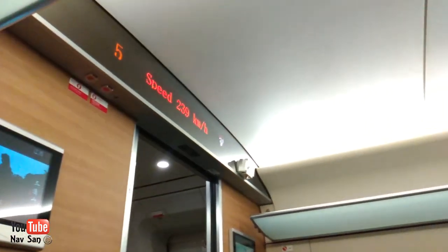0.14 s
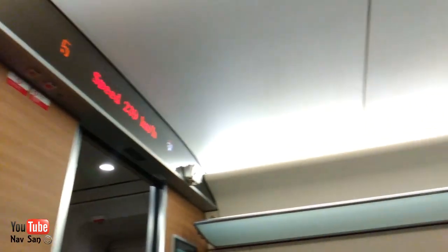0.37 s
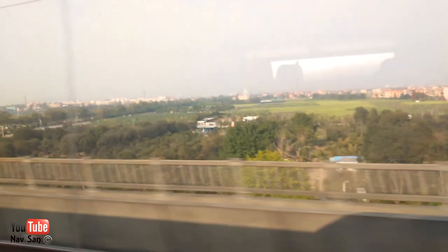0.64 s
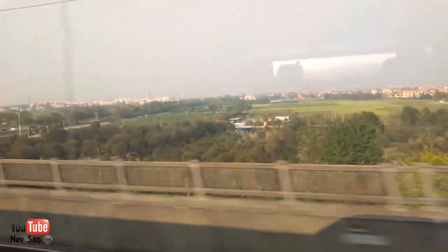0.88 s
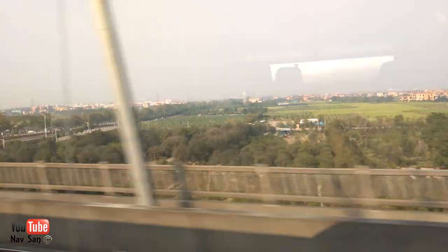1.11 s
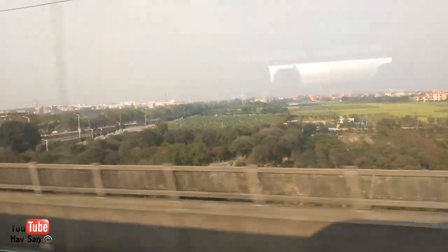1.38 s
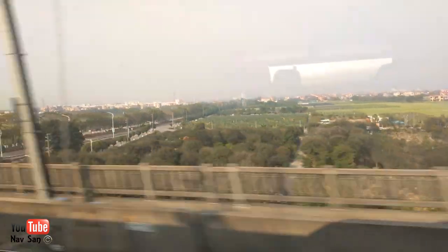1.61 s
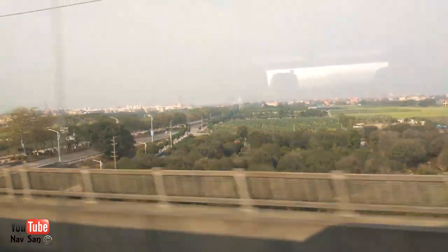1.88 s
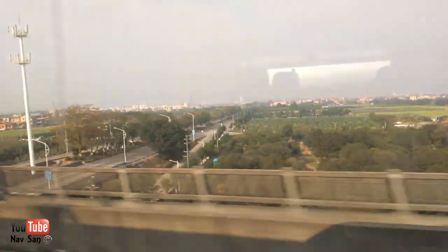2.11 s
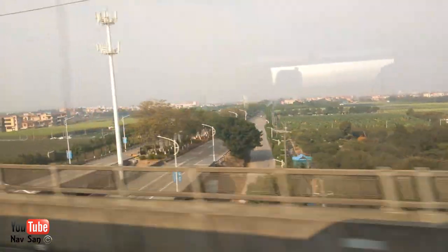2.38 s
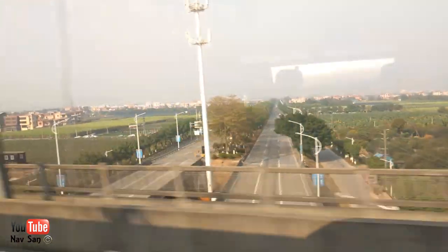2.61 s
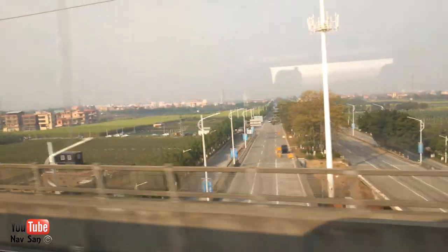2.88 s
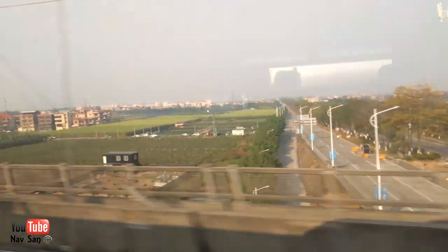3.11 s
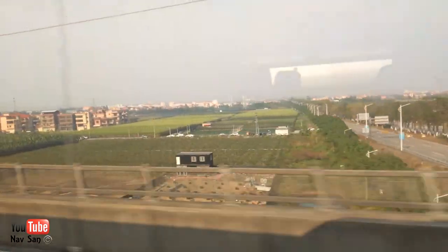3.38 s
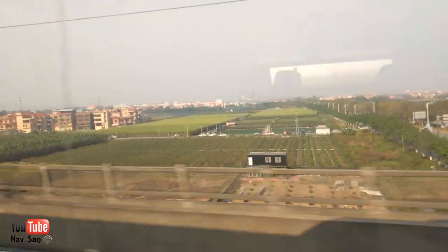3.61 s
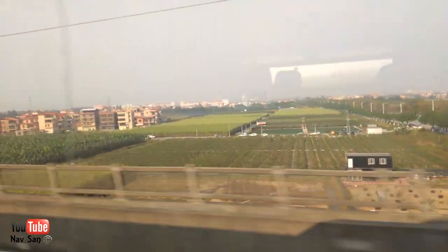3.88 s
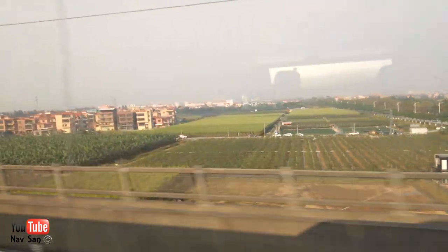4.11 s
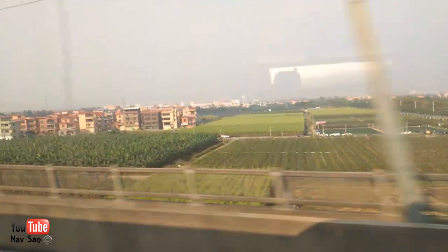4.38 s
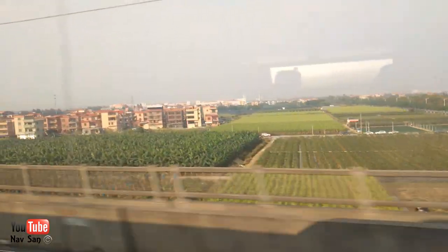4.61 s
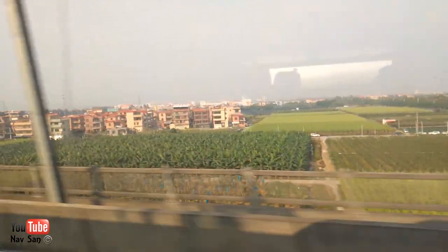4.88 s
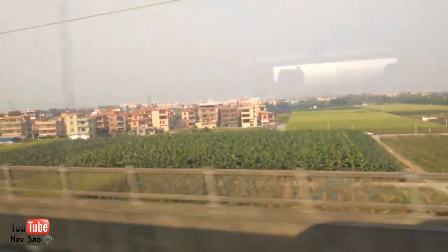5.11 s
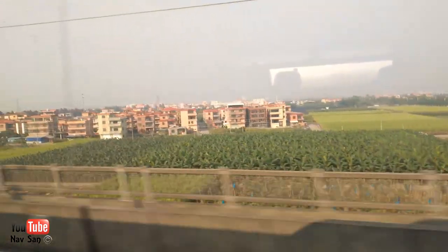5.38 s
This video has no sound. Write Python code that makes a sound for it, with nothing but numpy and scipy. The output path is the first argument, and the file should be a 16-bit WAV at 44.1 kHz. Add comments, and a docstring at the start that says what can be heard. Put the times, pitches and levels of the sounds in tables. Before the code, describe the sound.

Continuous low rumble and mid-range rolling roar of a speeding train, heard inside the carriage on a small handheld stereo device. It begins with more treble rush near the door, swelling briefly into an abrupt click and cut. At the window seat the sound darkens; something rubs past close by, then the roar and boom keep throbbing gently, with tiny dull ticks, fitting squeaks and faint hiss to the end.

```python
"""Inside a fast train: the car body booms and drones, wheel and air roar come through floor and window,
with a faint hiss on top. Most layers are shaped noise; unsteady sines hum beneath.
It opens near the car end, with a brighter roar; a hard edit with a click moves to a window seat,
where something brushes past and air swells by. Small ticks, snaps and squeaks sound in both places.
A two-port microphone subtracts each port, delayed, from the other."""
import sys
import numpy as np
from scipy import signal
from scipy.fft import rfft, irfft, next_fast_len
from scipy.io import wavfile
from scipy.ndimage import uniform_filter1d, map_coordinates

SR = 44100
rng = np.random.default_rng(int(sys.argv[2]) if len(sys.argv) > 2 else 0)


def int16_out(signal):
    """Quantize to a 16-bit WAV file."""
    q = np.round(np.clip(np.atleast_2d(signal).T, -1, 1) * 32767)
    wavfile.write(sys.argv[1], SR, q.astype(np.int16))


def volts_from_decibels(level):
    """Turn decibel levels (scalar or array-like) into linear amplitude factors."""
    exponent = np.asarray(level, float) / 20
    return 10 ** exponent


N = 242550  # samples, 5.5 s

# All levels are those at the ports, ahead of the microphone's own response.
EDIT_S = .6609  # the move from car end to window seat

# Resonances of the car shell in three groups: centre_hz, width_hz (of one pass), relative_db
BOOM = [(52, 5.8, 2), (66.4, 7.3, -6.5)]
DRONE = [(114.5, 79, 1.5), (125, 12, -1), (171, 42, -4)]
PANEL = [(234, 72.5, -2.5), (272.2, 28, 1.5), (311.7, 40, -8)]
# Base levels of the groups, and the full length of their level bumps
BOOM_DB, DRONE_DB, PANEL_DB = -32.5, -24.5, -30.5
THROB_S, SWELL_S = .16, 0.15
# Throbs of the boom, swells and sags of drone and panels: centre_s, rise_db (negative sags)
THROBS = [(.17, -1), (.77, 0), (.93, 9), (1.05, 9.5), (1.78, 11), (1.99, 3.5), (2.12, 5.5), (2.24, 6.5),
          (2.93, -9.5), (3.02, 6.5), (3.2, 7), (3.29, 2), (3.57, 8), (3.68, 5.5), (3.88, 6), (4.1, 6.5),
          (4.29, 9), (4.52, 9), (4.78, 5.5), (5.08, 7), (5.39, 8)]
DRONE_SWELLS = [(.68, 2.5), (.87, 4), (1.21, 5.5), (1.38, -3.5), (1.65, 3), (2.25, 1), (2.53, 5.5),
                (2.71, 3.5), (3.08, 3.5), (3.37, 5), (3.55, -4.5), (3.76, 4.5), (4.17, 3), (4.6, 5),
                (4.89, 1), (5.2, -3), (5.35, 0.5)]
PANEL_SWELLS = [(.15, 5.5), (.8, 5), (.96, -11.5), (1.19, 4), (1.66, 6), (2.2, 2), (2.67, 6), (3.05, 5.5),
                (3.5, 4.5), (3.81, 2), (4.09, 1), (4.51, 4.5), (5, -6), (5.15, -4.5), (5.29, 8),
                (5.41, 3.5)]
# Wavering tones of the running gear: pitch_hz, level_db (rms before wavering)
HUM = [(134.6, -37), (640, -56), (748.3, -52), (1570, -72.5), (2160, -79.5)]
# Drift of the rumble between the ports as the microphone turns: time_s, left_over_right_db
SHELL_LEAN = [(0, -2.5), (.6, -2.5), (.7, .5), (2.3, .5), (2.7, -1), (4.2, .5), (4.7, 0), (5.5, -2)]

# Rolling roar as the rail surface changes: time_s, level_db
ROUGH_TRACK = [(.7, -35.5), (.78, -38), (.9, -35), (1.1, -35), (1.42, -38.5), (1.77, -34.5), (1.89, -37),
               (2.15, -35), (2.3, -35), (2.4, -38.5), (2.65, -35.5), (2.8, -38), (3.07, -35), (3.3, -34),
               (3.45, -32), (3.63, -37.5), (3.85, -35), (3.97, -38), (4.23, -34), (4.42, -36),
               (4.58, -32.5), (4.75, -34.5), (5.5, -36)]
# Hiss of air past the window: time_s, level_db
AIRFLOW = [(1.2, -80.5), (1.46, -78), (1.62, -75), (1.77, -79.5), (2.45, -82.5), (2.7, -80), (3.07, -78),
           (3.49, -86.5), (3.65, -81), (3.82, -75.5), (4.0, -78), (4.23, -76.5), (4.7, -76.5), (5.18, -77),
           (5.5, -74)]
# Noise colours at the seat: freq_hz, relative_db
ROAR = [(25, -29), (40, -12), (80, -9), (200, -10.5), (330, 8.5), (450, 11.5), (700, 6.5), (950, 5.5),
        (1150, -3), (1600, -11), (2200, -15.5), (3000, -36), (4000, -69.5)]
RUSH = [(800, -33.5), (1500, 8), (2200, -1), (3000, -6), (4000, -16), (5500, -14), (8000, -20.5),
        (12000, -44)]
HISS = [(2000, -34.5), (4000, -6), (6000, -16), (8000, -7), (10000, -5), (13000, -19), (16500, -35.5)]
AIRY = [(4000, -31), (7000, -11), (10000, -1.5), (12000, -4), (13500, -1), (15300, -5), (16500, -44)]
RUSH_DB, AIRY_DB = -57.5, -79  # mean levels at the seat
RUSH_PER_TRACK, RUSH_PER_AIR, AIRY_PER_AIR = 0.31, .4, .8  # dB per dB of track or airflow

# Noise colours near the car end: freq_hz, relative_db
END_ROAR = [(150, -39.5), (300, 6.5), (500, 0), (900, -3.5), (1200, -9.5), (1700, -19), (2500, -27),
            (3500, -58)]
END_RUSH = [(800, -31), (1500, 5.5), (2200, 4), (3000, 0), (3700, -2.5), (4200, -6.5), (6000, -13),
            (9000, -23), (12000, -56), (15000, -47)]
END_ROAR_DB, END_RUSH_DB = -30, -50.5  # levels before the rise
END_RISE_DB, END_RISE_S = 4, 0.045  # rise of the rush at the edit, and its time constant

# Swish of the brushing stroke: freq_hz, relative_db
BRUSHED = [(300, -5.5), (500, 7), (1000, 7), (2200, 6), (2950, -1.5), (4000, -7.5), (5200, -9), (6300, -11),
           (7500, -14), (11000, -19.5), (15000, -29), (16000, -44.5)]
# Narrow resonance of the rubbed surface: centre_hz, width_hz (of one pass), relative_db
WHISTLE = [(2970, 150, 0)]
BRUSH_S, BRUSH_DB = .856, -42  # onset and level of the stroke
BRUSH_ATTACK_S, BRUSH_HOLD_S, BRUSH_RELEASE_S = .032, .014, .026
TRAIL_DB, TRAIL_S = -52.5, .29  # the softer drag that follows
WHISTLE_DB, WHISTLE_TRAIL_DB = -15, 3.5  # relative to the swish; extra in the drag

# Dull ticks: start_s, peak_db (of the dull core), centre_hz
TICKS = [(.487, -40, 2800), (1.2552, -47, 2600), (1.673, -44, 2800), (1.787, -48, 3200),
         (1.799, -44.5, 2900), (2.17, -45, 2700), (2.329, -44, 2900), (2.695, -44, 2700),
         (3.439, -45, 2600), (3.868, -44, 2800), (4.269, -46, 2700), (4.606, -44.5, 2700),
         (5.022, -48, 2800), (5.099, -47, 2700), (5.294, -48, 2600)]
# Bright crackling snaps: start_s, left_peak_db, centre_hz, decay_s, left_over_right_db
SNAPS = [(.488, -44, 10500, .001, 12), (2.0945, -52, 10500, .011, -1), (5.021, -60, 7500, .006, -2),
         (5.031, -55, 8000, .007, -4), (5.4145, -56, 7500, .005, 3)]
# Tiny squeaks: middle_s, peak_db, start_pitch_hz, length_s
SQUEAKS = [(0.225, -54, 2640, .06), (0.243, -58.5, 3770, 0.09), (.48, -49, 2595, .05),
           (0.784, -53, 1650, .2), (1.756, -64.5, 2970, .05), (1.788, -68, 4620, .02),
           (1.851, -51, 1805, 0.05), (1.934, -69, 2970, 0.07), (1.949, -73, 4620, .04),
           (3.386, -48, 1570, .09), (3.7, -56, 1783, 0.068), (3.786, -68, 4680, 0.046),
           (4.323, -49.5, 1610, 0.18)]

# Airy swells: middle_s, level_db (at the middle), length_s
WHOOSHES = [(0.775, -72.5, 0.12), (1.495, -76, 0.1), (1.607, -80, .06), (2.599, -74, 0.3),
            (2.615, -72.5, 0.12), (3.846, -81, 0.25), (4.235, -78.5, 0.1)]
# Colour of the airy swells: freq_hz, relative_db
WHOOSH = [(3000, -37), (5000, -3.5), (6300, -5), (8000, 2.5), (11000, 3), (14000, -2), (15500, -16),
          (16500, -35.5)]

# Likeness of the noise at the two ports: freq_hz, correlation (no unit)
ALIKE = [(40, .75), (65, 0.46), (100, 0.78), (200, 0.62), (350, 0.73), (500, 0.67), (800, 0.83),
         (1200, 0.23), (1600, 0.07)]
# Balance of the ports at the seat and near the car end: freq_hz, left_over_right_db
SEAT_LEAN = [(50, -4), (70, 0.5), (105, -4), (135, 3), (200, 0), (600, 0.5), (1000, 5.5), (1500, 16),
             (2100, 3), (2600, -3), (3600, -1), (6000, -0.5), (12000, 1)]
END_LEAN = [(300, 1), (1000, -0.5), (1500, 5), (2600, 5.5), (6000, 2.5), (12000, 4.5)]
# Share of the other port that is subtracted: freq_hz, share (no unit)
CROSS = [(300, 0.025), (550, 0), (1000, 0.72), (2000, 0.59), (3100, 0.98), (4200, 0.38), (5200, 0.3),
         (6300, 0.4), (8000, 0.2), (12000, 0.1)]
PORT_DELAY_S, MIC_LOW_HZ = 0.0004814, 40.3  # delay between ports, corner of the bass cut


def body():
    """Track roughness shakes the car shell, which answers in three resonance groups; running gear hums."""
    boom_db = BOOM_DB + swells(THROBS, THROB_S)
    drone_db = DRONE_DB + swells(DRONE_SWELLS, SWELL_S)
    panel_db = PANEL_DB + swells(PANEL_SWELLS, SWELL_S)
    shell = 0
    for level_db, modes in [(boom_db, BOOM), (drone_db, DRONE), (panel_db, PANEL)]:
        ringing = rush(resonant(modes), SEAT_LEAN, patchy_db=-0.5)
        shell = shell + volts_from_decibels(level_db) * evened(ringing, hold_s=0.041, share=0.82)
    lean_db, = curves(SHELL_LEAN)
    leaning_shell = volts_from_decibels(np.outer([.5, -.5], lean_db)) * shell
    return leaning_shell + volts_from_decibels([[1], [-1]]) * running_gear()


def running_gear():
    """Sines whose level and phase both wander smoothly."""
    t = np.arange(N) / SR
    hum = 0
    for hz, db in HUM:
        level = volts_from_decibels(db + 2.5 * wobble(6)) * np.sqrt(2)  # rms to peak
        hum = hum + level * np.sin(2 * np.pi * hz * t + 2 * wobble(12))
    return hum


def window_seat():
    """Rolling roar follows the track, hiss and airy treble follow the airflow, the rush follows both."""
    roar_db, = curves(ROUGH_TRACK)
    hiss_db, = curves(AIRFLOW)
    track = roar_db - roar_db.mean()
    flow = hiss_db - hiss_db.mean()
    rush_db = RUSH_DB + RUSH_PER_TRACK * track + RUSH_PER_AIR * flow + 1.1 * wobble(19)
    airy_db = AIRY_DB + AIRY_PER_AIR * flow + .9 * wobble(18)
    roar = volts_from_decibels(roar_db) * rush(coloured(ROAR), SEAT_LEAN, patchy_db=1.06)
    air = volts_from_decibels(rush_db) * rush(coloured(RUSH), SEAT_LEAN, patchy_db=2.6)
    hiss = volts_from_decibels(hiss_db + .9 * wobble(17)) * rush(coloured(HISS), SEAT_LEAN, patchy_db=1.5)
    airy = volts_from_decibels(airy_db) * rush(coloured(AIRY), SEAT_LEAN, patchy_db=5.0)
    return roar + air + hiss + airy + brush()


def car_end():
    """Near the gangway the roar leaks in with much more treble, growing just before the edit."""
    to_edit_s = np.minimum(np.arange(N) / SR - EDIT_S, 0)
    rise_db = END_RISE_DB * np.exp(to_edit_s / END_RISE_S)
    roar_db = END_ROAR_DB + rise_db / 3 + 0.41 * wobble(6)
    rush_db = END_RUSH_DB + rise_db + 1.2 * wobble(14)
    roar = volts_from_decibels(roar_db) * rush(coloured(END_ROAR), END_LEAN, patchy_db=1.5)
    return roar + volts_from_decibels(rush_db) * rush(coloured(END_RUSH), END_LEAN, patchy_db=2.2)


def brush():
    """One brisk stroke nearby: friction noise with a whistling resonance, then a trailing drag."""
    t = np.arange(N) / SR - BRUSH_S
    rise = np.clip(t / BRUSH_ATTACK_S, 0, 1)
    release_t = np.maximum(t - BRUSH_ATTACK_S - BRUSH_HOLD_S, 0)
    stroke = volts_from_decibels(BRUSH_DB) * np.exp(-release_t / BRUSH_RELEASE_S)
    trail = volts_from_decibels(TRAIL_DB) * np.clip(1 - (t / TRAIL_S) ** 4, 0, 1)
    swish = (stroke + trail) * rush(coloured(BRUSHED), SEAT_LEAN, patchy_db=1.5)
    ringing = evened(rush(resonant(WHISTLE), SEAT_LEAN, patchy_db=1), hold_s=.02, share=.7)
    whistle = volts_from_decibels(WHISTLE_DB) * (stroke + volts_from_decibels(WHISTLE_TRAIL_DB) * trail) * ringing
    return rise * volts_from_decibels(1.8 * wobble(160)) * (swish + whistle)


def ticks():
    """Short dull ticks, as of a recorder clipping on the tallest pressure peaks: struck, gritty bands."""
    out, t = np.zeros((2, N + SR)), np.arange(SR // 3) / SR
    for s, db, hz in TICKS:
        impulse = [[1], [.8]] * (t == 0)
        grit = .04 * rng.standard_normal((2, len(t)))
        blow = (impulse + grit) * volts_from_decibels(-60 * t / .01)  # falls 60 dB in 10 ms
        core = band(blow, hz / 1.5, hz * 1.35)
        edge = band(blow, hz * 1.4, hz * 2.8)  # thin and bright
        place(out, s, volts_from_decibels(db) * (core + volts_from_decibels(-21) * edge) / np.abs(core).max())
    return out[:, :N]


def snaps():
    """Crackling snaps from the fittings: partly shared noise in a high band, with a Gaussian decay."""
    out, t = np.zeros((2, N + SR)), np.arange(SR // 3) / SR
    for s, db, hz, decay_s, lean_db in SNAPS:
        grit = rng.standard_normal((3, len(t)))
        crackle = (grit[:2] + grit[2]) * np.exp(-(t / decay_s) ** 2)
        burst = band(crackle, hz / 1.6, hz * 1.45)
        level = volts_from_decibels(db + lean_db * np.array([[0], [-1]]))
        place(out, s, level * burst / np.abs(burst).max(axis=1, keepdims=True))
    return out[:, :N]


def squeaks():
    """Tiny squeaks from the fittings: swelling tones that sag in pitch, with a randomly drifting phase."""
    out, t = np.zeros((2, N + SR)), np.arange(SR // 3) / SR
    for s, db, hz, length in SQUEAKS:
        swell = np.sin(np.pi * np.clip(t / length, 0, 1)) ** 2
        jitter = np.cumsum(rng.normal(0, .05, len(t)))
        tone = np.sin(2 * np.pi * hz * t * (1 - 0.1 * t) + jitter)
        place(out, s - length / 2, volts_from_decibels(db) * swell * tone)
    return out[:, :N]


def whooshes():
    """Soft treble swells of air going by the window: noise under cosine arches."""
    t = np.arange(N) / SR
    swell = 0
    for s, db, length in WHOOSHES:
        swell = swell + volts_from_decibels(db) * np.cos(np.pi * np.clip((t - s) / length, -.5, .5))
    return swell * rush(coloured(WHOOSH), SEAT_LEAN, patchy_db=1.0)


def rush(gain, lean, patchy_db):
    """Diffuse noise at the two ports, rms 1, with patches of random gain over time and frequency."""
    z = signal.stft(rng.standard_normal((2, N)), nperseg=512)[2]
    field = uniform_filter1d(rng.standard_normal(z.shape[1:]), size=6, axis=0)
    field = uniform_filter1d(field, size=10, axis=1)
    pair = signal.istft(z * volts_from_decibels(patchy_db * unit(field)), nperseg=512)[1][:, :N]

    def mid_side_gain(hz):
        # this mix of mid and side gives the ports the likeness in ALIKE
        turn = np.arccos(np.clip(along(ALIKE, hz), -1, 1)) / 2
        return gain(hz) * np.array([np.cos(turn), np.sin(turn)])

    mid, side = filtered(pair, mid_side_gain)
    tilt = lambda hz: volts_from_decibels(np.outer([.5, -.5], along(lean, hz)))
    return unit(filtered(np.array([mid + side, mid - side]), tilt))


def evened(x, hold_s, share):
    """Narrow noise with part of its own beating divided out: a steadily driven resonance."""
    hold = int(hold_s * SR)
    power = uniform_filter1d(uniform_filter1d(np.mean(x ** 2, 0), hold), hold)
    return unit(x / (np.abs(power) + 0.048) ** (share / 2))


def resonant(modes):
    """Gain of resonances, each applied twice for steep skirts; their powers add."""
    def gain(f):
        power = 0
        for c, w, db in modes:
            one_pass = (f * w) ** 2 / ((c * c - f * f) ** 2 + (f * w) ** 2)
            power = power + volts_from_decibels(2 * db) * one_pass ** 2
        return np.sqrt(power)
    return gain


def coloured(spectrum):
    """Gain of a (Hz, dB) spectrum."""
    return lambda hz: volts_from_decibels(along(spectrum, hz))


def swells(rows, length):
    """Smooth bumps in dB, length seconds wide, around each (s, dB) row."""
    t = np.arange(N) / SR
    return sum(db * np.cos(np.pi * np.clip((t - s) / length, -.5, .5)) ** 2 for s, db in rows)


def wobble(rate):
    """A smooth random curve, rate knots a second."""
    knots = rng.standard_normal(int(N * rate / SR) + 4)
    return map_coordinates(knots, [np.arange(N) * rate / SR])


def curves(rows):
    """One value per sample for each column after the time."""
    s, *cols = np.transpose(rows)
    return [np.interp(np.arange(N) / SR, s, c) for c in cols]


def along(points, hz):
    """(Hz, value) points joined on a log axis."""
    f, v = np.transpose(points)
    return np.interp(np.log(hz + 1), np.log(f + 1), v)


def filtered(x, response):
    """x times a response of frequency, ends mirrored."""
    edge = SR // 4
    x = np.pad(x, [(0, 0)] * (x.ndim - 1) + [(edge, edge)], "reflect")
    m = next_fast_len(x.shape[-1])
    spectrum = rfft(x, m) * response(np.fft.rfftfreq(m, 1 / SR))
    return irfft(spectrum, m)[..., edge:edge + N]


def band(x, low_hz, high_hz):
    """x through a Butterworth band-pass."""
    return signal.lfilter(*signal.butter(2, [low_hz, high_hz], "bandpass", fs=SR), x)


def place(out, start_s, sound):
    """Adds a short sound into out at start_s."""
    out[:, round(start_s * SR):][:, :sound.shape[-1]] += sound


def unit(x):
    """Scaled to rms 1."""
    return x / np.sqrt(np.mean(x ** 2) + 1e-20)


def scene():
    """Shell, ticks, snaps and squeaks run through both places; air swells come only after the edit."""
    seat = window_seat()
    underfloor = filtered(seat, lambda hz: hz < 250)
    after = np.clip((np.arange(N) / SR - EDIT_S) / .001 + 1, 0, 1)  # 1 ms crossfade
    places = (1 - after) * (car_end() + underfloor) + after * seat
    return body() + places + ticks() + snaps() + squeaks() + whooshes()


def band_limit(x):
    """A steep low-pass at the top of the band."""
    return signal.sosfilt(signal.butter(12, 15710, fs=SR, output="sos"), x)


def record(dry):
    """Each channel is its port minus the delayed other port, with a steep bass cut; the edit clicks."""
    share = lambda hz: np.clip(along(CROSS, hz), 0, 1)
    delay = lambda hz: np.exp(-2j * np.pi * hz * PORT_DELAY_S)
    other = filtered(dry[::-1], lambda hz: share(hz) * delay(hz))
    bass_cut = lambda hz: hz ** 3 / np.sqrt(hz ** 6 + MIC_LOW_HZ ** 6)
    # the root makes up for the power that the other port adds
    heard = filtered(dry - other, lambda hz: bass_cut(hz) / np.sqrt(1 + share(hz) ** 2))
    t = np.arange(N) / SR
    # the click is a spike that rises fast and drops at once, sooner on the left
    rise = np.clip(1 + (t - EDIT_S) / .0003, 0, 1)
    fall = np.clip(1 - (t - EDIT_S) / [[.000015], [.00012]], 0, 1)
    spike = volts_from_decibels([[-14.5], [-27]]) * rise * fall
    soft_ends = np.sin(np.pi / 2 * np.clip(np.minimum(t, t[::-1]) / .008, 0, 1)) ** 2
    return band_limit((heard + spike) * soft_ends)


dry = scene()
out = record(dry)
int16_out(out)
```